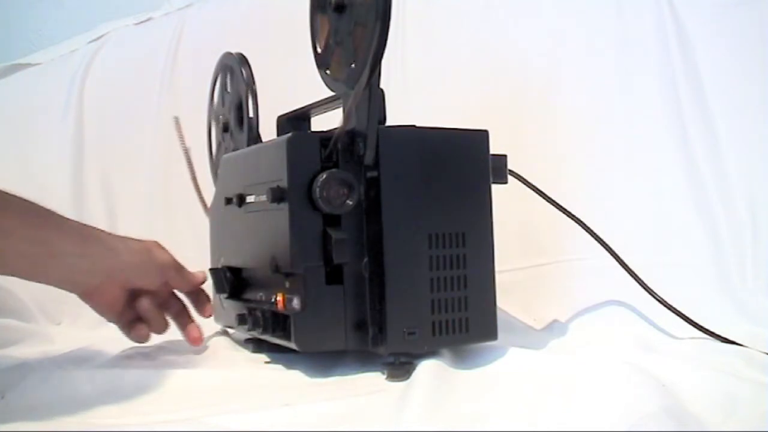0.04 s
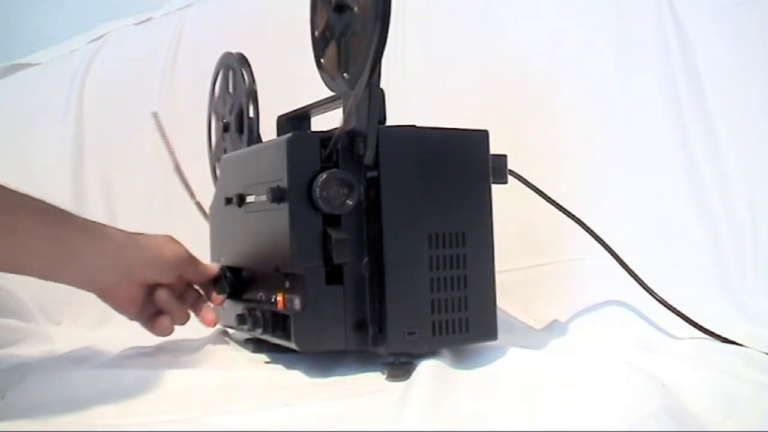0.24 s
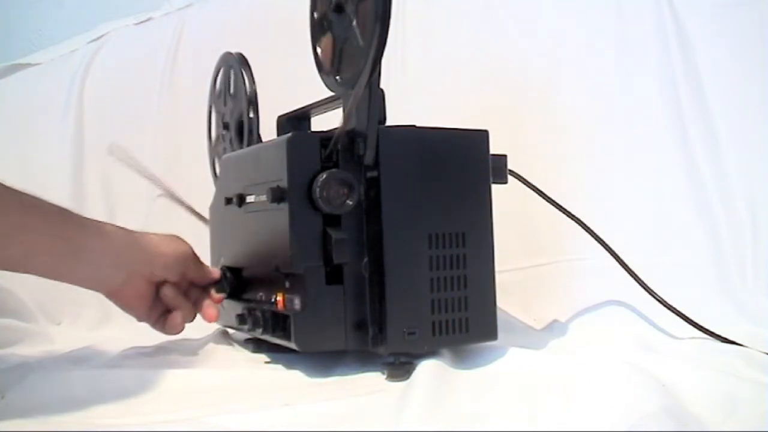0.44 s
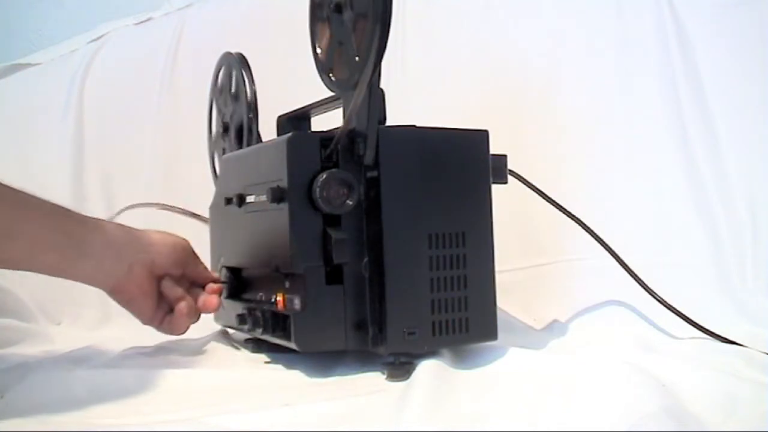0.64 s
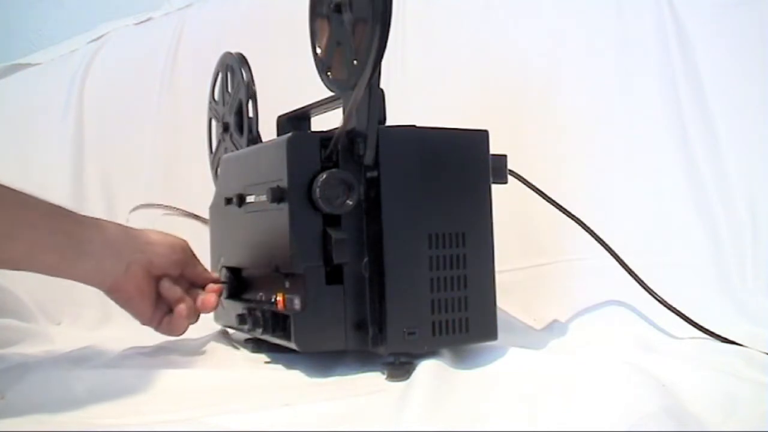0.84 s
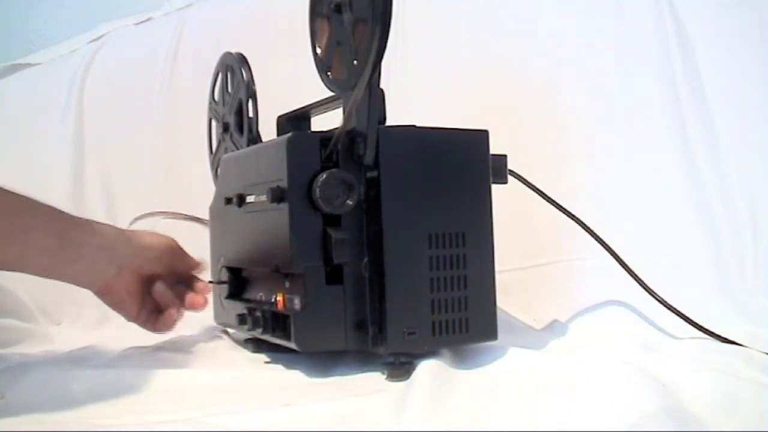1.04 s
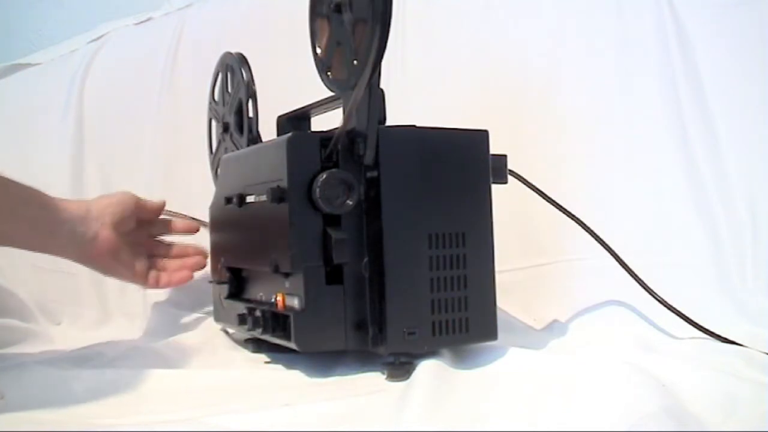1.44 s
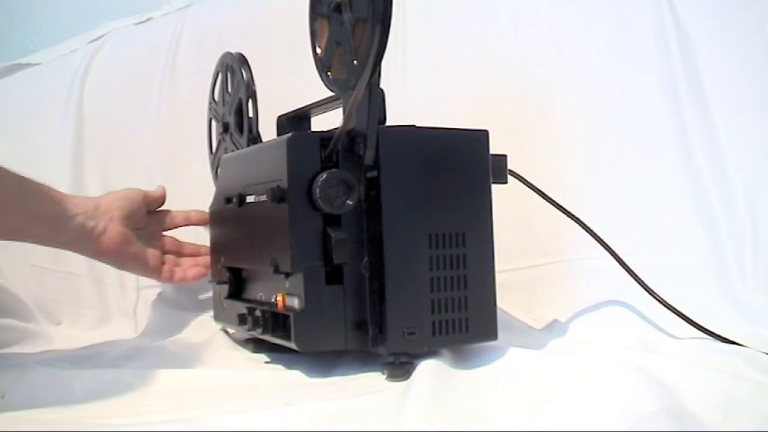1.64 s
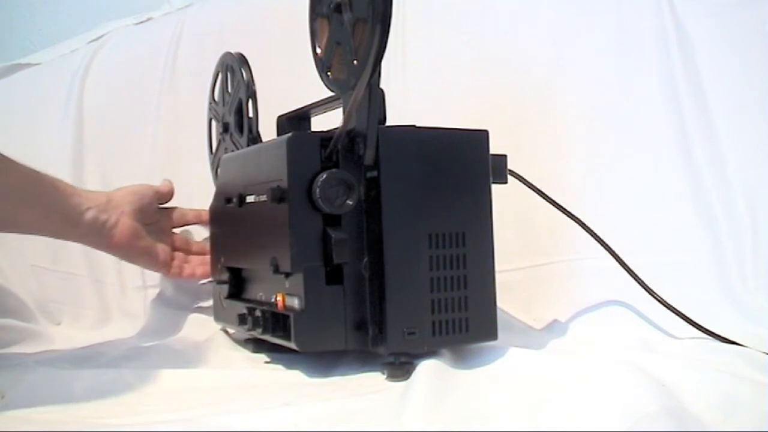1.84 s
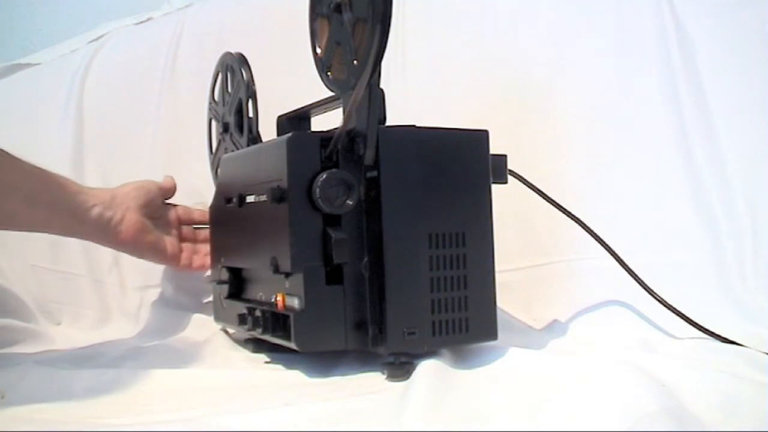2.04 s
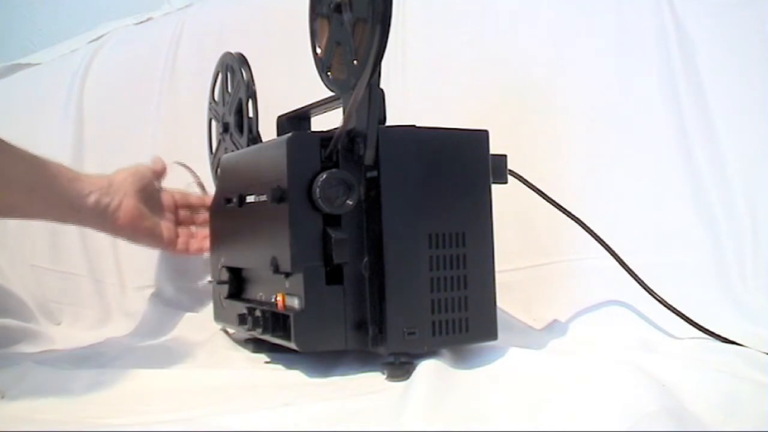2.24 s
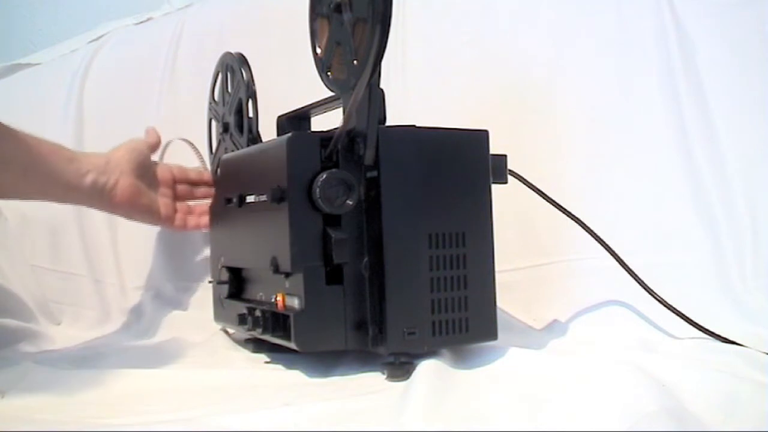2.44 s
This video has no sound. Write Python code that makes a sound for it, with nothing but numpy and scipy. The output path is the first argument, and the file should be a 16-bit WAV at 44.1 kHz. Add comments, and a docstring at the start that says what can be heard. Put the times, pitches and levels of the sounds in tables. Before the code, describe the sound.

A small film projector clatters rapidly, close by in a room, over whirring gears and a motor drone. A switch is thrown with a loud clunk, the clicking slows to a stop, and only a soft fan rush and hum remain.

```python
"""A small film projector clatters close by in a room, over fan rush, whirring gears and a motor drone.
For every frame the claw clicks into the film and the gate knocks the case; loose parts rattle lightly.
A switch is thrown with a loud clunk, its contacts snapping and its panel ringing. The film drive
slows to a last click, and only the fan and the mains hum carry on."""
import sys
import numpy as np
from scipy import signal
from scipy.fft import rfft, irfft
from scipy.io import wavfile
from scipy.ndimage import uniform_filter1d

SR = 44100
rng = np.random.default_rng(int(sys.argv[2]) if len(sys.argv) > 2 else 0)


def unload_audio(sound):
    """Save the sound as a 16-bit wav file, at the path given as the first command line argument."""
    columns = np.transpose(np.atleast_2d(sound))
    # keep every value between -1 and 1, then stretch to whole-number steps
    steps = np.round(np.clip(columns, -1, 1) * 32767)
    wavfile.write(sys.argv[1], SR, steps.astype(np.int16))


N = 114660
T = np.arange(N) / SR
BIN_HZ = np.arange(N + 1) * SR / (2 * N)
FRAME_HZ, FIRST_FRAME_S = 23.84, .0192


def amp(db):
    """Decibels to gain."""
    return 10 ** (np.asarray(db) / 20)


def unit(x):
    """Scale to an rms of 1."""
    return x / np.sqrt(np.mean(x ** 2))


def gains(points):
    """EQ curve through (frequency [Hz], level [dB]) points."""
    hz, db = np.array(points).T
    return amp(np.interp(np.log(BIN_HZ + 1), np.log(hz), db))


def colour(x, points):
    """Minimum-phase EQ that keeps the power of white noise."""
    cepstrum = irfft(np.log(unit(gains(points))))[:N]
    cepstrum[0] /= 2
    return irfft(rfft(x, 2 * N) * np.exp(rfft(2 * cepstrum, 2 * N)))[:N]


def weigh(x, gain):
    """Apply a gain to every frequency."""
    return irfft(rfft(x, 2 * N) * gain)[..., :N]


def even(x, width_hz):
    """Flatten a burst's spectral bumps wider than width_hz, keeping its energy."""
    power = uniform_filter1d(np.abs(rfft(x, 2 * N)) ** 2, int(width_hz * 2 * N / SR))
    return weigh(x, np.sqrt(power.mean() / power))


def lowpass(x, hz):
    """Roll off the treble above hz."""
    return signal.sosfilt(signal.butter(4, min(hz, SR / 3), fs=SR, output="sos"), x)


def convolve(x, response):
    """Play x through a response."""
    return signal.fftconvolve(x, response)[:N]


def noise():
    """White noise."""
    return rng.standard_normal(N)


def walk(rate_hz):
    """Slow random modulation with an rms of 1."""
    span = int(SR / rate_hz)
    return unit(uniform_filter1d(uniform_filter1d(noise(), span), span))


def fade(age, t60):
    """Exponential decay from age zero."""
    return (age >= 0) * np.exp(-np.log(1000) * np.maximum(age, 0) / t60)


def ring(modes, blows):
    """Modes struck by (time [s], gain) blows."""
    push = np.zeros(N)
    for s, gain in blows:
        push[int(s * SR)] += gain
    response = sum(amp(db) * fade(T, t60) * np.cos(2 * np.pi * hz * T) for hz, db, t60 in modes)
    return convolve(push, response)


def turning(repeat):
    """Grit of which the share `repeat` loops with every frame."""
    size = round(SR / FRAME_HZ)
    loop = unit(irfft(np.exp(2j * np.pi * rng.random(size // 2 + 1)), size))
    return np.sqrt(repeat) * np.resize(loop, N) + np.sqrt(1 - repeat) * noise()


# Stereo width of diffuse sound (frequency [Hz], side minus mid [dB])
WIDTH = [(30, 3), (100, -6.5), (700, -4.5), (2000, -12), (4000, -7), (6000, -4.5), (9000, 3.5), (15000, 1)]
def spread(mid, side):
    """Mid and side to left and right."""
    return mid + weigh(side, gains(WIDTH)) * np.array([[1], [-1]])


# Fan and mains tones (frequency [Hz], level [dB])
HUM_TONES = [(49, -84.5), (99.6, -69.5), (349.9, -68.5), (392, -67.5), (500.6, -68.5), (632, -62),
             (688, -66), (732, -59.5), (832, -58.5), (879, -64)]
# EQ of the fan's rush (frequency [Hz], level [dB])
AIR_EQ = [(25, -18), (70, -19), (125, -6), (160, -14), (200, -9), (390, -5), (445, -8), (520, -2),
          (800, 0.5), (960, -6.5), (1200, -7), (1500, -12.5), (1850, -11.5), (2400, -11), (2700, -19.5),
          (3900, -19.5), (4900, -23), (6100, -22.5), (8500, -36), (10500, -36.5), (15500, -45.5)]
# Air resonances of the housing (frequency [Hz], width [Hz], boost [dB])
HOUSING = [(338, 17, 8.5), (1060, 58, 4.5), (1802, 90, 9), (2105, 30, 7), (2995, 210, 5.5), (3880, 59, 6),
           (5730, 79, 5.5)]
def fan():
    """The bed: fan and mains tones waver and drift together over air rushing through the housing."""
    drift_hz, waver_db, air_db = .7, 1.1, -52
    drift = np.cumsum(drift_hz * walk(6.5)) / SR
    tones = sum(amp(db + waver_db * walk(14)) * np.sqrt(2) * np.sin(2 * np.pi * (hz * T + drift))
                for hz, db in HUM_TONES)
    housing = amp(sum(db / (1 + (2 * (BIN_HZ - hz) / width) ** 2) for hz, width, db in HOUSING))
    rush = spread(colour(noise(), AIR_EQ), colour(noise(), AIR_EQ))
    return tones + amp(air_db) * weigh(rush, housing)


# EQ of the gear whirr (frequency [Hz], level [dB])
GEAR_EQ = [(25, -48), (55, -22), (75, 0.5), (180, -3.5), (340, -4.5), (480, 7.5), (700, -8.5), (950, -4),
           (1300, 1), (2000, -6), (2600, -1.5), (4000, -9.5), (6500, -19), (8500, -33), (15000, -47)]
def gears():
    """Gears whirr, swelling twice a frame, and fade out after the switch."""
    stop_s, run_down_s, level_db, swing_db = .623, .19, -50, 2
    running = np.clip(1 - (T - stop_s) / run_down_s, 0, 1)
    swell = amp(level_db + swing_db * np.cos(4 * np.pi * FRAME_HZ * (T - FIRST_FRAME_S)))
    mid, side = (colour(turning(repeat=.9) * swell * running, GEAR_EQ) for _ in range(2))
    return spread(mid, side)


# Motor drone and whine (frequency [Hz], level [dB])
MOTOR_TONES = [(118.6, -55), (849.5, -53), (1311, -61), (1406, -65), (1572, -64)]
def motor():
    """The motor drones at a steady pitch, with a quick fade after the switch."""
    stop_s, fade_s = .673, .05
    drone = sum(amp(db) * np.sqrt(2) * np.sin(2 * np.pi * hz * T) for hz, db in MOTOR_TONES)
    return drone * np.clip((stop_s - T) / fade_s + .5, 0, 1)


# EQ of the claw's click (frequency [Hz], level [dB])
CLAW_EQ = [(200, -31), (700, -3.5), (1500, -1), (2000, -9.5), (2600, 3.5), (3200, -7), (3800, 1),
           (4200, -4), (4800, -1), (5300, -6.5), (6500, -5.5), (7100, -7), (8600, -23), (11500, -25),
           (13500, -25), (15500, -34)]
# Ring of the claw (frequency [Hz], level [dB], t60 [s])
CLAW_MODES = [(2560, -5, .035), (3790, 0, .045), (7080, -7, .03)]
def claw(times, strengths, accents_db):
    """The claw scrapes into the film and clinks; softer accents give a duller scrape."""
    attack_s, hold_s, rise_db_per_s, db_per_octave = .0045, .0025, 5, 9
    pulls = strengths * amp(rise_db_per_s * times)
    cutoffs_hz = 15000 * 2 ** (accents_db / db_per_octave)
    grit, contact = turning(repeat=.34), np.zeros(N)
    for s, pull, cutoff in zip(times, pulls, cutoffs_hz):
        near = np.abs(T - s) < .05
        age = T[near] - s
        attack = np.clip(age / attack_s + .5, 0, 1)
        decay = fade(np.maximum(age - hold_s, 0), t60=.013)
        contact[near] += pull * lowpass(attack * decay * grit[near], cutoff)
    scrape = amp(-40.5) * colour(contact, CLAW_EQ)
    clink = amp(-49) * ring(CLAW_MODES, zip(times, pulls))
    return scrape + lowpass(clink, hz=6900)


# Body of the case (frequency [Hz], level [dB], t60 [s])
CASE_MODES = [(515, -13, .06), (700, 2, .11), (1100, -10, .035), (1340, -14, .04), (1800, -13, .05)]
def gate(times, strengths):
    """The gate gives the case a soft knock just behind each claw click."""
    lag_s = .0062
    knocks = amp(-38.5) * ring(CASE_MODES, zip(times + lag_s, strengths))
    return lowpass(knocks, hz=2170)


# Last strokes, harder under the switch, then slowing to a halt (time [s], accent [dB])
LAST_STROKES = [(0.5231, 2), (.5648, 4.5), (.609, -3), (.664, -5.5), (.7405, -9.5)]
def film_drive():
    """Claw and gate play twelve steady frames, then the last strokes, each a little uneven in level."""
    scatter_db = .5
    steady = [(FIRST_FRAME_S + frame / FRAME_HZ, 0) for frame in range(12)]
    times, accents_db = np.array(steady + LAST_STROKES).T
    strengths = amp(accents_db + scatter_db * rng.standard_normal(len(times)))
    return claw(times, strengths, accents_db) + gate(times, strengths)


# Light rattles (time [s], level [dB])
RATTLES = [(0.042, -44.5), (.287, -49), (0.453, -51)]
def rattles():
    """Loose parts chatter briefly between strokes."""
    low_hz, top_hz, half_width_s = 2940, 5740, .0025
    shake = sum(amp(db) * np.exp(-((T - s) / half_width_s) ** 2) for s, db in RATTLES)
    band = signal.butter(2, [low_hz, top_hz], "bandpass", fs=SR, output="sos")
    chatter = lowpass(signal.sosfilt(band, noise()), top_hz)
    return shake * unit(chatter)


# Switch contacts snapping over (time [s], level [dB], t60 [s])
SNAPS = [(.5775, -38, .03), (.5799, -15, .014), (.5811, -12, .011), (.5836, -18, .012), (.5848, -15, .012),
         (.5869, -15, .007)]
# EQ of the switch's crack (frequency [Hz], level [dB])
SWITCH_EQ = [(60, -20), (300, -12.5), (650, -3.5), (950, -2), (1700, 2.5), (2800, 3.5), (4300, 5.5),
             (6300, 2.5), (7300, -8.5), (9000, -21), (10500, -21), (13000, -30), (15500, -56)]
# Ring of the switch and its panel (frequency [Hz], level [dB], t60 [s])
PANEL_MODES = [(716, 0, .09), (1210, -4, .14), (1703, -6, .14), (1990, -5, .1), (2410, -2, .12),
               (2795, -1, .12), (2940, -1, .11), (3935, -5, .12), (4624, -6, .1), (4980, -4, .07),
               (5600, -2, .07), (6080, -3, .06)]
def switch():
    """The clunk: a quick run of hard snaps, the hardest ringing the panel."""
    force = np.sqrt(sum((amp(db) * fade(T - s, t60)) ** 2 for s, db, t60 in SNAPS))
    crack = even(force * np.sign(noise()), width_hz=700)
    hardest_s = max(SNAPS, key=lambda snap: snap[1])[0]
    panel = ring(PANEL_MODES, [(hardest_s, amp(-39))])
    return colour(crack, SWITCH_EQ) + lowpass(panel, hz=6740)


# Ring of the soft knock (frequency [Hz], level [dB], t60 [s])
KNOCK_MODES = [(1430, -1, .09), (3790, 0, .05)]
def soft_knock():
    """A soft ringing knock just after the clunk, as the drive begins to slow."""
    knock_s = .61
    return lowpass(ring(KNOCK_MODES, [(knock_s, amp(-41))]), hz=6900)


def room_tail():
    """One short, smooth tail from the walls, briefer in the treble."""
    predelay_s, crossover_hz, body_t60, treble_t60 = .0038, 3400, .26, .15
    low = 1 / (1 + (BIN_HZ / crossover_hz) ** 4)
    wash, age = noise(), T - predelay_s
    body, treble = (even(wash * fade(age, t60), width_hz=50) for t60 in (body_t60, treble_t60))
    return unit(weigh(body, low) + weigh(treble, 1 - low)) / np.sqrt(N)


def room(send):
    """Stereo reverb from two unrelated tails."""
    return amp(-8) * spread(convolve(send, room_tail()), convolve(send, room_tail()))


# Stereo balance (frequency [Hz], left minus right [dB])
BALANCE = [(30, 9), (70, -9), (200, -9), (380, -4.5), (700, -1.6), (2400, -.8), (4400, -2.5), (9000, -0.5)]
def scene():
    """Clatter and clunk feed the room; gears, motor and fan stay dry. The bass leans right."""
    clatter = film_drive() + rattles() + soft_knock()
    clunk = switch()
    reverb = room(clunk + amp(-.5) * clatter)
    mix = clatter + clunk + reverb + gears() + motor() + fan()
    lean = np.sqrt(gains(BALANCE))
    return weigh(mix, np.array([lean, 1 / lean]))


def record(dry):
    """A steep high cut on the whole mix."""
    top_hz = 15800
    return signal.sosfilt(signal.ellip(8, .2, 70, top_hz, fs=SR, output="sos"), dry)


dry = scene()
out = record(dry)
unload_audio(out)
```